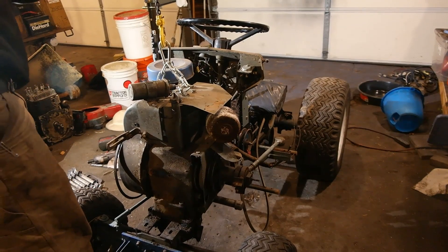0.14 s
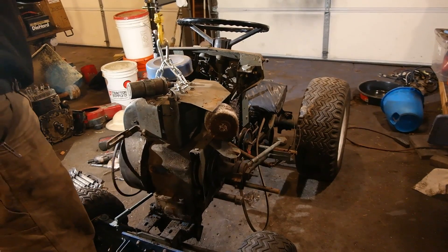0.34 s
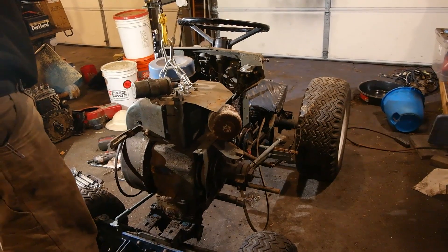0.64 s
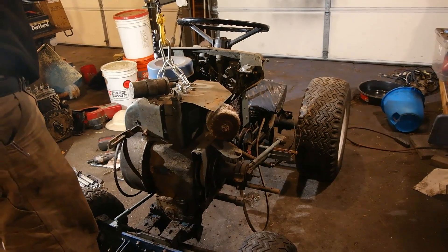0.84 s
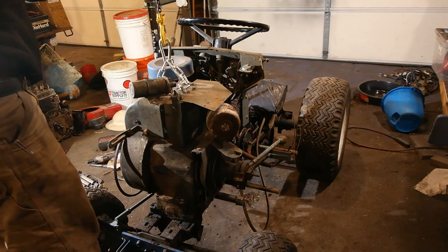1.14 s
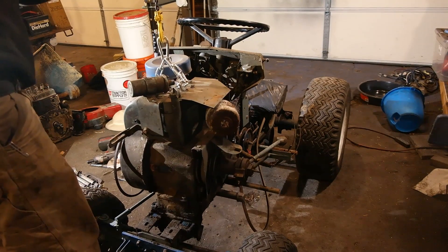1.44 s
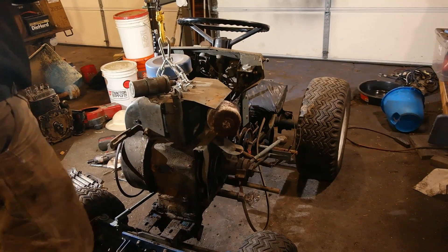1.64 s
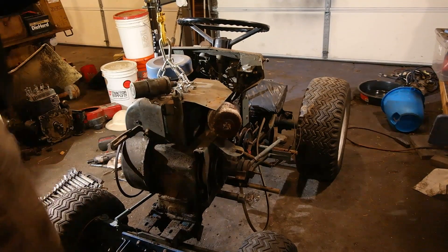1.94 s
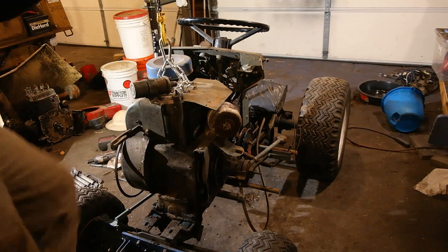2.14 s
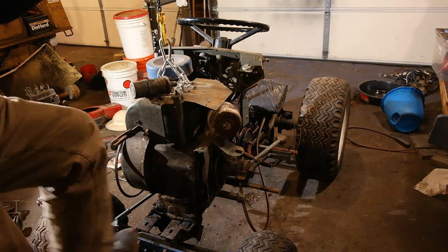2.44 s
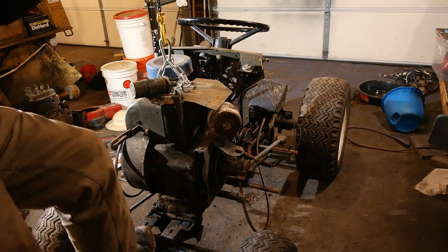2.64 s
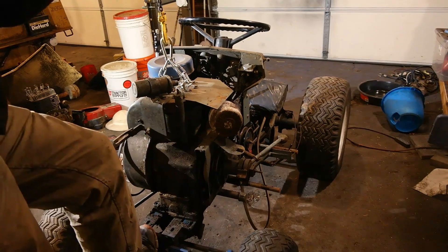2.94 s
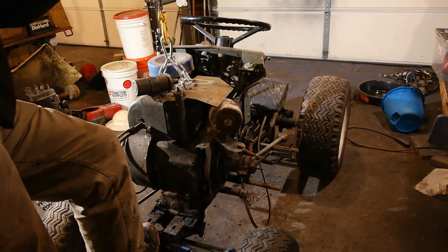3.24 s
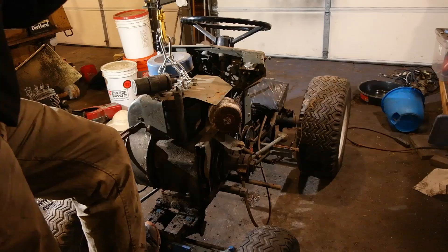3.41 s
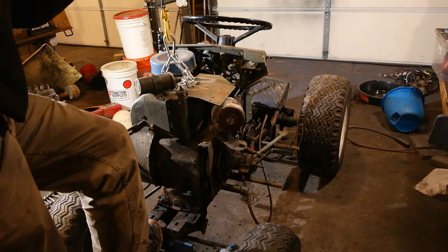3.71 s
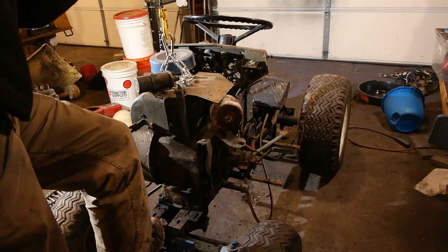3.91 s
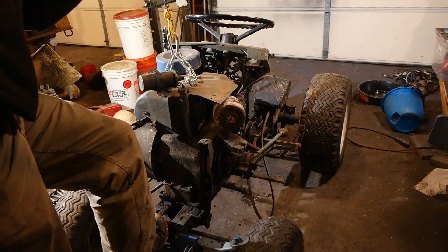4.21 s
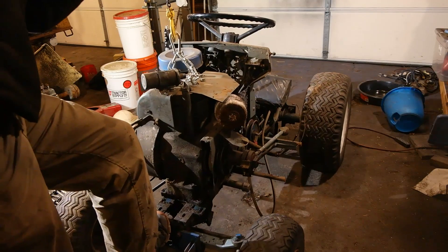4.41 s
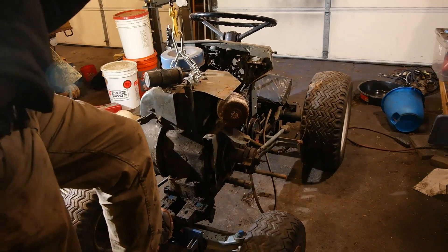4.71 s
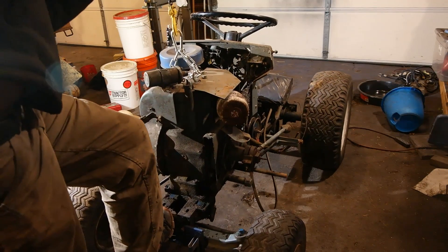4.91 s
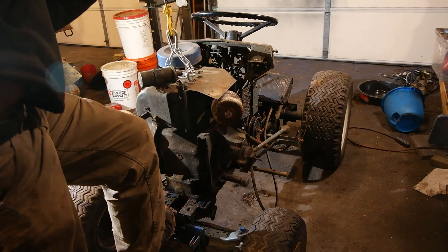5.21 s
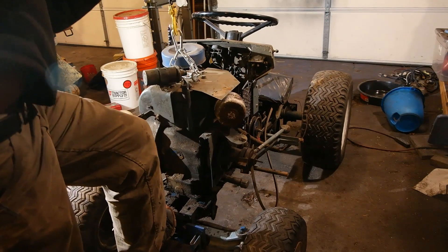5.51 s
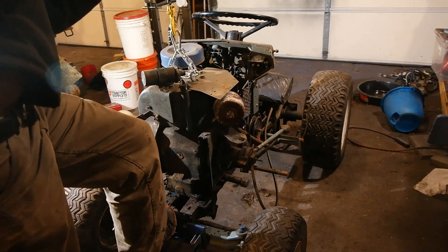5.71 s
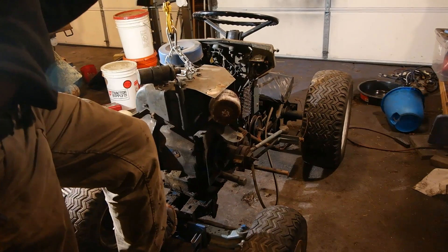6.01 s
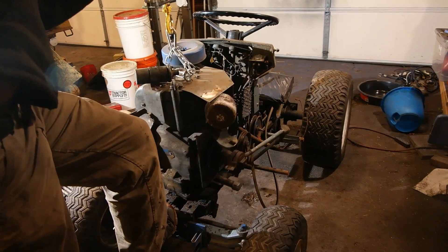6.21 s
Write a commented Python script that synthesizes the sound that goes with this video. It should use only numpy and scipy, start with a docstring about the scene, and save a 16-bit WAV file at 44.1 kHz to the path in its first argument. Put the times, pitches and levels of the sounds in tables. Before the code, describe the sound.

Close stereo pickup in a hard-walled garage, hoist slightly left. The echo of a snap fades, then a chain hoist is worked: bright, dry pawl snaps, links clinking and grinding on the wheel, dull thuds of the load, brief creaks. Hauling stops; clothes rustle faintly over quiet air. A lone snap rings out, then a second, slightly stronger spell of snaps and rattles follows to the end.

```python
"""In a garage, a ratchet chain hoist lifts an engine out of a small tractor in two spells of hauling.
First the echo of a snap dies away; then the pawl snaps as impacts through steel resonances, links clink
and grind on the wheel, knocks excite hoist and load, and hook and links creak by stick-slip.
In the pause work clothes rustle as filtered friction noise, then a late snap leads to the second spell.
Throughout, hard walls answer with decaying diffuse noise, over a faint bed of still air."""
import sys
import numpy as np
from scipy import signal
from scipy.fft import rfft, irfft
from scipy.io import wavfile

SR = 44100
rng = np.random.default_rng(int(sys.argv[2]) if len(sys.argv) > 2 else 0)


def unload_wav(signal):
    """Save mono or channel-first audio to the path in sys.argv[1] as 16-bit WAV at rate SR, clipped to [-1, 1]."""
    wavfile.write(
        sys.argv[1],
        SR,
        np.round(np.clip(np.atleast_2d(signal).T, -1, 1) * 32767).astype(np.int16),
    )


N = 280035
TIME = np.arange(N) / SR


def amp(db):
    """Logarithmic level: decibels to amplitude gain."""
    return 10 ** (np.asarray(db) / 20)


def unit(x):
    """Power normalisation: scale to rms 1."""
    return x / np.sqrt(np.mean(x ** 2))


def freqs(x):
    """Fourier analysis: frequencies [Hz] of the spectrum of x."""
    return np.arange(x.shape[-1] // 2 + 1) * SR / x.shape[-1]


def lookup(points, hz):
    """Logarithmic pitch axis: interpolate (frequency [Hz], value) points on it."""
    f, value = np.transpose(points)
    return np.interp(np.log(hz + 1), np.log(f), value)


def colour(x, points):
    """Minimum-phase filtering: impose a (frequency [Hz], gain [dB]) curve causally."""
    size = x.shape[-1]
    log_gain = np.log(amp(lookup(points, freqs(x))))
    # folding the cepstrum onto positive times makes the filter causal
    cepstrum = irfft(log_gain, size)
    cepstrum[1:size // 2] *= 2
    cepstrum[size // 2 + 1:] = 0
    return irfft(rfft(x) * np.exp(rfft(cepstrum)), size)


def resonate(x, modes):
    """Modal superposition: sum damped resonances, neighbours in opposite phase."""
    f = freqs(x)
    response = 0
    for k, (hz, width, db) in enumerate(modes):
        mode = 1j * f * width / (hz ** 2 - f ** 2 + 1j * f * width)
        response = response + (-1) ** k * amp(db) * mode
    return irfft(rfft(x) * response, x.shape[-1])


def walk(rate):
    """Slow random fluctuation: join normal random values, rate per second, by straight lines."""
    knots = rng.standard_normal(int(N / SR * rate) + 2)
    return np.interp(TIME * rate, np.arange(len(knots)), knots)


def impacts(t, rate, scatter_db):
    """Shot noise: tiny contacts of random moment, sign and size, on average rate per second."""
    hit = rng.random(len(t)) < rate / SR
    sign = rng.choice([-1, 1], len(t))
    return hit * sign * amp(scatter_db * rng.standard_normal(len(t)))


def with_level(x, db, length):
    """Energy equivalence: give a burst the energy of level db held for length seconds."""
    energy = np.sum(x ** 2) + 1e-18
    return x * amp(db) * np.sqrt(length * SR / energy)


def add(track, s, x):
    """Linear superposition: mix x in at time s."""
    i = max(int(s * SR), 0)
    track[i:i + len(x)] += x[:N - i]


def swells(rows, rise, fall):
    """Exponential growth and decay: movements rise before and fall after a hold; the loudest rules."""
    each = []
    for s, length, db in rows:
        before = np.maximum(s - TIME, 0)
        after = np.maximum(TIME - s - length, 0)
        each.append(db - rise * before - fall * after)
    return amp(np.max(each, axis=0))


# spells of hauling: (time [s], length [s], effort [dB])
HAULS = [(0, 1.48, -1.5), (4.65, 1.7, 1.5)]


def hauling_effort():
    """Slow muscular drive: effort builds up before each spell and ebbs after it."""
    return swells(HAULS, rise=15, fall=13)  # dB/s


# resonances of pawl and links: (frequency [Hz], width [Hz], gain [dB])
STEEL = [(1290, 170, -28), (1840, 150, -11.5), (2697, 190, -12), (3130, 190, -2.5), (3730, 680, -8.5),
         (4414, 440, -0.5), (5030, 530, -5), (5490, 240, 1), (7010, 1300, -8.5), (8630, 310, -2.5),
         (9550, 210, -5), (10330, 170, -3.5), (11640, 770, -6), (13090, 400, 3.5), (14080, 890, 4.5),
         (14890, 1200, 3.5)]
# spectrum that a snap sends to the walls: (frequency [Hz], gain [dB])
SNAP_ALL_ROUND = [(200, -15.5), (900, -11), (1700, -6.5), (2300, -13), (3100, -4), (4700, -1.5),
                  (6500, -5.5), (8500, -4.5), (10800, -6), (13000, 0.5), (15500, 3.5)]
# pawl snaps: (time [s], level [dB], treble [dB], chatter length [s], room send re level [dB])
PAWL_SNAPS = [(0.1903, -14, 2, 0.0037, 5.5), (0.2796, -13.5, 3, 0.0037, 4.5), (0.6679, -13, -5, 0.0012, 3),
              (0.728, -15.5, -6, 0.0024, 2), (0.8086, -14.5, -5, 0.0017, -1.5),
              (1.3124, -14.5, 2.5, 0.0043, 6.5), (3.7081, -16.5, 1.5, 0.0034, 8),
              (4.4768, -26.5, -5, 0.0055, 6), (4.548, -25, -7, 0.0078, 3.5), (4.9968, -12, -0.5, 0.0043, 2),
              (5.4118, -17.5, -5, 0.0034, 5), (5.4883, -17, -5, 0.0037, 2), (5.9263, -12, 1.5, 0.004, 5),
              (6.0078, -10, 4, 0.0025, 1.5)]


def pawl():
    """Impact excitation: the sprung pawl buzzes on a tooth, then stops; returns direct and wall-bound."""
    t = np.arange(4096) / SR
    bands = np.geomspace(1000, 16000, 30)
    direct, spread = np.zeros(N), np.zeros(N)
    for s, db, treble_db, length, room_db in PAWL_SNAPS:
        # every tooth is met a little differently and has its own timbre
        tooth_db = 2 * rng.standard_normal(len(bands))
        tilt = [(1000, -2), (2200, -2), (3000, 0), (6500, 0), (12500, treble_db)]
        timbre = np.c_[bands, tooth_db + lookup(tilt, bands)]
        pressure = np.exp(-np.maximum(t - length, 0) / 0.00098) * np.exp(-t / 0.034)
        chatter = impacts(t, rate=13000, scatter_db=4.0) * pressure
        struck_steel = resonate(chatter, STEEL) + amp(-20.5) * chatter
        snap = with_level(colour(struck_steel, timbre), db, length)
        add(direct, s, snap)
        # summed over all directions, the peaks and dips of the steel even out
        all_round = colour(colour(signal.unit_impulse(len(t)), SNAP_ALL_ROUND), timbre)
        to_walls = with_level(all_round, db + room_db, length)
        add(spread, s, to_walls + amp(room_db - 11.0) * snap)
    return direct, spread


# chain links clinking; the first row is the dying echo of a snap just before the start:
# (time [s], level [dB], treble [dB], settling time constant [s])
ECHO_AND_CLINKS = [(0.0, -42.5, -10, 0.022), (0.2739, -29, -19, 0.0019), (0.461, -33.5, -10, 0.012),
                   (0.4899, -27, -10, 0.0053), (0.508, -30, -42, 0.016), (0.8885, -32, -31, 0.0039),
                   (0.9198, -27, 0, 0.0041), (0.966, -33.5, -19, 0.0035), (0.9854, -26, -13, 0.0014),
                   (1.208, -42.5, -15, 0.0046), (1.515, -30.5, -6, 0.0029), (1.7268, -38, -1.5, 0.032),
                   (1.794, -37, -47, 0.0027), (2.822, -63.5, -8.5, 0.0089), (2.872, -67, -18, .008),
                   (4.1434, -43.5, -14, 0.0036), (4.3564, -47, -31, 0.0063), (4.7725, -35.5, -11, 0.012),
                   (4.7857, -26.5, -8, 0.0084), (4.948, -41.5, -7, 0.0035), (5.2437, -45, -12, 0.016),
                   (5.288, -29, -4.5, 0.009), (5.304, -28, -11, 0.0031), (5.6335, -41, 3, .0033),
                   (5.6839, -30, -8.5, 0.0095), (6.147, -39, -18, 0.03), (6.2168, -25.5, -5.5, 0.0095)]


def echo_and_links():
    """Damped random impacts: a snap's echo dies away, then links strike and rattle to rest."""
    t = np.arange(8192) / SR
    out = np.zeros(N)
    for s, db, treble_db, settle in ECHO_AND_CLINKS:
        dying_impacts = impacts(t, rate=2700, scatter_db=2.5) * np.exp(-t / settle)
        ringing = resonate(dying_impacts, STEEL) + amp(-13.0) * dying_impacts
        tilt = [(150, 10.5), (900, 4.5), (4500, -0.5), (12000, treble_db)]
        add(out, s, with_level(colour(ringing, tilt), db, settle))
    return out


# resonances of the hoist and its hanging load: (frequency [Hz], width [Hz], gain [dB])
FRAME = [(28, 13, -5.5), (54.4, 18, -2), (65.1, 11, 2), (111, 9.7, -1), (155.4, 19, -1), (200, 18, 2),
         (239, 28, 1), (292.6, 32, 5.5), (335, 33, 4), (385, 32, 3.5), (444, 45, -3), (548, 37, -0.5),
         (661, 30, -3.5), (729.5, 25, -1), (805, 14, -14.5), (986, 30, -1), (1044, 20, -3),
         (1262, 36, -3.5), (1380, 11, -16.5), (1460, 180, -10.5), (1557, 10, -14.5), (2022, 78, -11.5),
         (2050, 53, -27), (2760, 91, -14.5)]
# the chain seating under load: (time [s], level [dB], boom [dB], clank [dB], shudder time constant [s])
SEATING_KNOCKS = [(0.0, -31.5, 11.5, -4, 0.007), (.045, -41, -14, 8, 0.016), (.312, -32, -33, 0, 0.07),
                  (.347, -31, -14, 2, 0.019), (.507, -20, -10.5, 3, 0.018), (.6, -38.5, -5, 0, 0.049),
                  (.92, -36.5, -5, -2, 0.012), (.987, -32, 12.5, 7, 0.024), (1.511, -37, -14, 19, 0.021),
                  (1.74, -46, 3, 5.5, 0.068), (2.565, -50.5, 8.5, -3, 0.01), (4.155, -50, 5, -4.5, .041),
                  (4.368, -45.5, 6, 2, 0.015), (4.786, -29, 4.5, -14, 0.03), (5.292, -26, -8, -17, 0.008),
                  (5.345, -36, 15, 7, 0.015), (5.696, -28, 10, -2.5, 0.011), (6.038, -35, 10, -0.5, 0.022),
                  (6.219, -26, -3, -17, 0.018)]


def knocks():
    """Modal response to a jerk: the loaded chain drops into its pocket; hoist and engine shudder."""
    t = np.arange(16384) / SR
    out = np.zeros(N)
    for s, db, boom_db, clank_db, shudder in SEATING_KNOCKS:
        envelope = (1 - np.exp(-t / 0.0018)) * np.exp(-t / shudder)
        jolts = impacts(t, rate=1300, scatter_db=5.5) * envelope
        contact = colour(jolts, [(30, -26.5), (300, -15.5), (1400, -6.5), (2500, -16.5), (8000, -28.5)])
        body = resonate(jolts, FRAME) + contact
        # where the chain seats decides which parts of the frame answer;
        # the middle takes part of the clank, and less the more the load booms
        middle_db = -5 + 0.45 * clank_db - 0.3 * boom_db
        weight = [(130, boom_db), (260, 0.0032), (380, 0.0023),
                  (520, middle_db), (780, middle_db), (1000, clank_db)]
        add(out, s, with_level(colour(body, weight), db, shudder))
    return out


# steel creaking in hook and links: (time [s], length [s], nominal pitch [Hz], level [dB])
STEEL_CREAKS = [(0.05, 0.036, 1227, -49.5), (0.881, 0.0053, 3020, -41), (0.98, 0.0039, 2860, -35),
                (1.429, 0.048, 724, -39), (1.491, 0.02, 752, -32.5), (1.725, 0.024, 778, -38),
                (2.811, 0.039, 3310, -70.5), (2.87, .012, 4220, -66), (3.62, .008, 5300, -62),
                (3.648, 0.013, 5100, -65), (5.662, 0.0076, 4260, -42), (6.113, 0.033, 793, -44),
                (6.144, 0.027, 3000, -40.5), (6.239, 0.026, 970, -37.5)]


def creaks():
    """Stick-slip friction: a short rough tone sags in pitch, with a rasp on every slip."""
    t = np.arange(8192) / SR
    out = np.zeros(N)
    for s, length, hz, db in STEEL_CREAKS:
        waver = 0.04 * walk(700)[:len(t)]
        sag = 0.04 * (np.exp(-t / 0.012) - 0.5)
        phase = 2 * np.pi * np.cumsum(hz * (1 + sag + waver)) / SR
        catch = amp(3.5 * walk(200)[:len(t)])
        grip = (1 - np.exp(-t / 0.0041)) * np.exp(-np.maximum(t - length, 0) / 0.012) * catch
        tone = np.sin(phase) + amp(-20) * np.sin(2 * phase) + amp(-24) * np.sin(3 * phase)
        slip_noise = rng.standard_normal(len(t)) * (1 + np.sin(phase))
        rasp = unit(colour(slip_noise, [(hz / 3, -14), (hz, 0), (hz * 2, -7), (hz * 6, -28)]))
        add(out, s, with_level((tone + amp(-9.5) * rasp) * grip, db, length))
    return out


# spectrum of links grinding on the wheel: (frequency [Hz], gain [dB])
GRIND_COLOUR = [(120, -24.5), (280, -8), (450, -1.5), (570, -7.5), (800, -10.5), (1030, -3), (1180, -0.5),
                (1350, 4.5), (1650, -4.5), (2100, -21.5), (3000, -8), (6000, -16)]
# loaded links dragged over the wheel: (time [s], length [s], level [dB])
WHEEL_DRAGS = [(.34, 0.086, -41.5), (.51, 0.075, -36.5), (.7, 0.11, -46), (.97, 0.028, -39),
               (1.5, 0.021, -42.5), (4.36, 0.044, -55.5), (4.79, 0.027, -45), (5.29, 0.052, -42.5),
               (5.45, 0.082, -43), (5.69, 0.033, -49.5), (6.08, 0.21, -46.5)]


def load_wheel():
    """Sliding friction of rough surfaces: loaded links grind over the wheel in fits and starts."""
    grit = unit(colour(impacts(TIME, rate=950, scatter_db=3.0), GRIND_COLOUR))
    drag = swells(WHEEL_DRAGS, rise=217.5, fall=172.5)  # dB/s
    return grit * drag * amp(0.75 * walk(45))


def slack_chain(effort):
    """Sparse random impacts: the loose end of the chain jingles faintly while the hoist is worked."""
    jingle = unit(resonate(impacts(TIME, rate=190, scatter_db=6.0), STEEL))
    # -65 dB at an effort of 0 dB, growing 1.7 dB for each dB of effort
    return jingle * amp(-65) * effort ** 1.7


def swaying_load(effort):
    """Forced vibration: the swaying load grumbles on its chain in step with the effort."""
    shake = rng.standard_normal(N)
    body = resonate(shake, FRAME) + amp(-11) * shake
    rumble = unit(colour(body, [(30, 4.5), (70, 9.5), (110, 9.5), (160, 1.5), (300, -4.5),
                                (800, -1), (2000, -5.5), (6000, -32)]))
    return rumble * effort * amp(-55.5 + 2.05 * walk(22))


# spectrum of cloth: (frequency [Hz], gain [dB])
CLOTH_COLOUR = [(100, -9.5), (700, 7.5), (2000, -2), (5000, -1.5), (9000, -5), (14000, -3), (17000, -4.5)]
# the worker shifts, clothes rustling: (time [s], length [s], level [dB])
BODY_SHIFTS = [(2.06, 0.012, -56.5), (2.3, 0.078, -52.5), (2.56, .06, -63.5), (2.8, 0.034, -70),
               (3.26, 0.082, -68), (3.5, 0.16, -70.5), (3.95, 0.11, -63.5)]


def clothes(effort):
    """Fibre friction: countless tiny contacts rustle as the worker hauls or shifts."""
    cloth = unit(colour(impacts(TIME, rate=10000, scatter_db=2), CLOTH_COLOUR))
    # -61 dB at an effort of 0 dB, growing 0.92 dB for each dB of effort
    sleeves = amp(-61) * effort ** 0.92
    shifting = swells(BODY_SHIFTS, rise=106, fall=74)  # dB/s
    return cloth * np.hypot(sleeves, shifting) * amp(2.4 * walk(30))


def delay(x, seconds):
    """Fourier shift theorem: delay by a fraction of a sample."""
    return irfft(rfft(x) * np.exp(-2j * np.pi * freqs(x) * seconds), len(x))


# direct sound at each port: (frequency [Hz], gain [dB])
LEFT_PORT = [(100, 3.1), (1000, 3.34), (4000, 3.7), (8000, 3), (13000, 9.8), (16000, 8.1)]
RIGHT_PORT = [(100, -3), (1000, -2.5), (4000, 1), (8000, 0.5), (13000, 3), (16000, -8.5)]


def at_ports(direct):
    """Interaural difference: the right port hears the hoist later and with its treble shaded."""
    lagged = delay(direct, 1.7e-5)
    return np.array([colour(direct, LEFT_PORT), colour(lagged, RIGHT_PORT)])


def port_pair(size, alike_hz):
    """Diffuse-field coherence: noise at two close ports, alike in the bass, unrelated in the treble."""
    mid, side = rng.standard_normal((2, size))
    likeness = 1 / (1 + (freqs(mid) / alike_hz) ** 2)
    mid, side = rfft(mid) * np.sqrt(1 + likeness), rfft(side) * np.sqrt(1 - likeness)
    return irfft(np.array([mid + side, mid - side]), size) / np.sqrt(2)


# spectrum of the walls: (frequency [Hz], gain [dB])
WALL_COLOUR = [(40, 0.5), (300, 0), (1200, 0.5), (3000, -0.5), (5000, 0.5), (9000, 8.5), (14000, -1.5)]
# garage decay: (frequency [Hz], time to fall 60 dB [s])
GARAGE_T60 = [(60, 0.25), (300, 0.72), (1000, 0.46), (2200, 0.51), (5500, 0.44), (9000, 0.36),
              (15000, 0.28)]


def garage(x, wet_db, build_s, lean_db):
    """Reverberation: clutter scatters the first echoes, then each band decays at its own rate."""
    noise = port_pair(size=40000, alike_hz=1460)
    t = np.arange(noise.shape[1]) / SR
    centres = np.geomspace(50, 16000, 14)
    tail = 0
    for hz, share in zip(centres, np.eye(len(centres))):
        band = irfft(rfft(noise) * lookup(np.c_[centres, share], freqs(noise)))
        decay_db = -60 * t / lookup(GARAGE_T60, hz)
        tail = tail + band * amp(lookup(WALL_COLOUR, hz) + decay_db)
    port_db = wet_db + np.array([[lean_db], [-lean_db]]) / 2
    tail = tail * (1 - np.exp(-t / build_s)) * amp(port_db)
    return signal.fftconvolve(x[None], tail, axes=1)[:, :N]


# spectrum of still air: (frequency [Hz], gain [dB])
AIR_COLOUR = [(15, -56), (25, -31), (48, -5.5), (69, -23), (86, -10.5), (173, -22), (552, -22),
              (826, -14.5), (2360, -30.5), (15500, -37.5)]


def still_air():
    """Stationary diffuse noise: a faint steady bed at both ports."""
    return unit(colour(port_pair(size=N, alike_hz=1587), AIR_COLOUR)) * amp(-75)


def scene():
    """Superposition: the hoist, ahead and to the left, adds to its reverberation and the air."""
    effort = hauling_effort()
    snaps, snaps_spread = pawl()
    echo_and_chain = echo_and_links() + slack_chain(effort)
    load = knocks() + creaks() + load_wheel()
    rest = clothes(effort) + swaying_load(effort)
    ports = at_ports(snaps + echo_and_chain + load + rest)
    to_room = snaps_spread + amp(4.0) * echo_and_chain + amp(-5.5) * load + rest
    room = garage(to_room, wet_db=-31.5, build_s=0.0011, lean_db=2.5)
    return ports + room + still_air()


def record(dry):
    """Soft saturation and band limiting: the sharpest peaks are rounded off and the top is cut."""
    rounded = 1.222 * np.tanh(dry / 1.374)
    low_pass = signal.ellip(10, 0.2, 70, 15800, fs=SR, output="sos")  # cut at 15800 Hz
    return signal.sosfilt(low_pass, rounded)


dry = scene()
out = record(dry)
unload_wav(out)
```